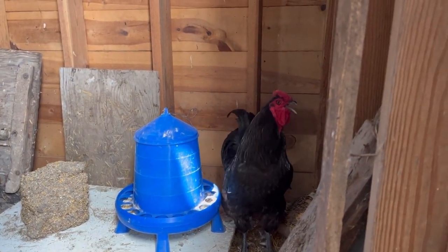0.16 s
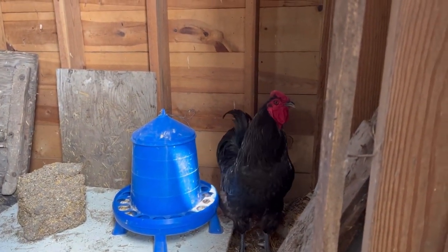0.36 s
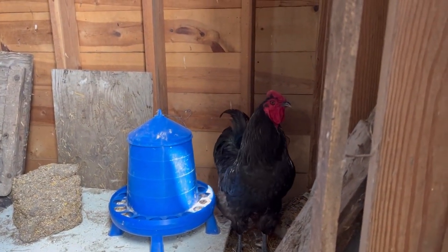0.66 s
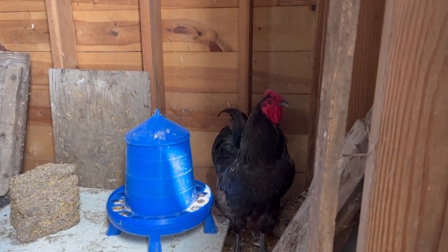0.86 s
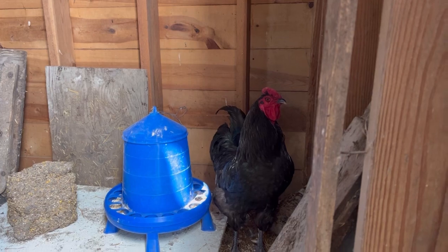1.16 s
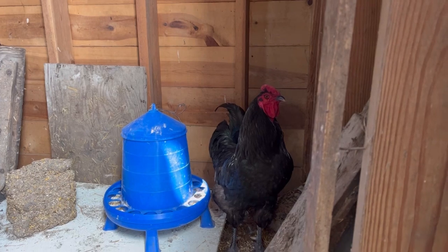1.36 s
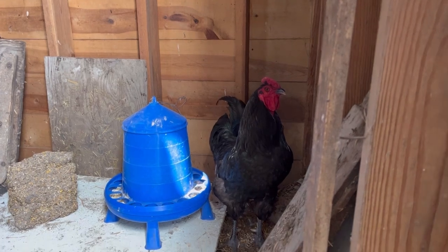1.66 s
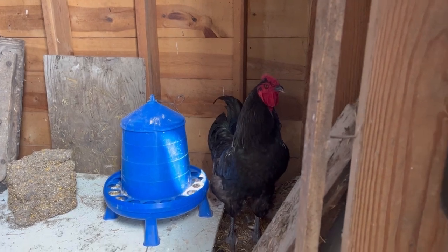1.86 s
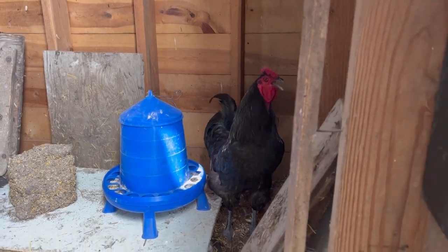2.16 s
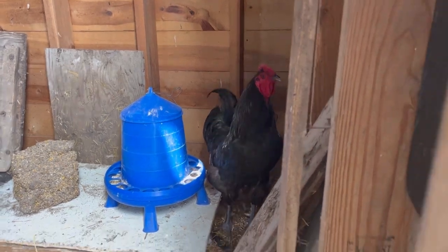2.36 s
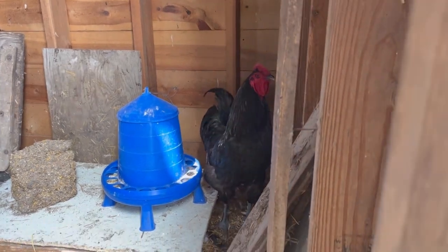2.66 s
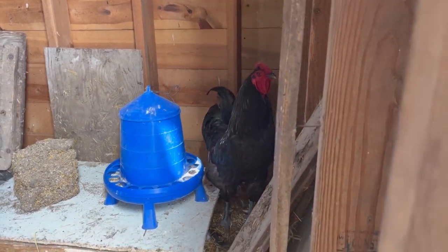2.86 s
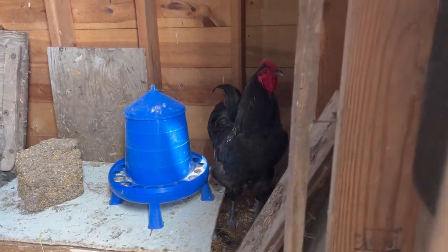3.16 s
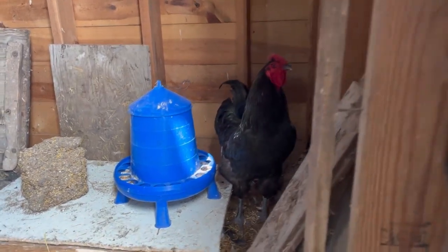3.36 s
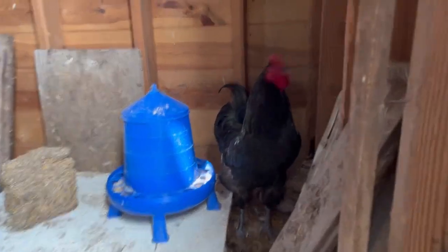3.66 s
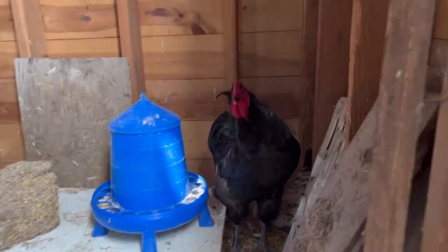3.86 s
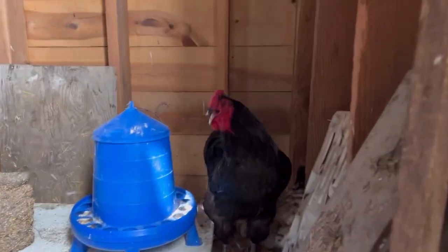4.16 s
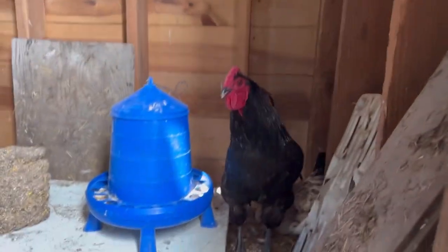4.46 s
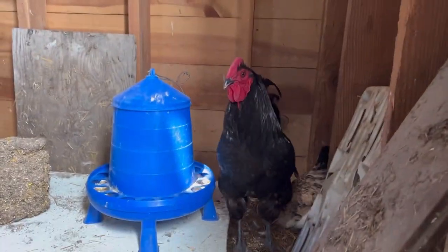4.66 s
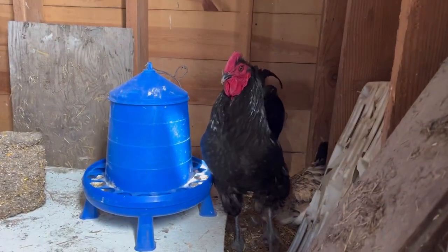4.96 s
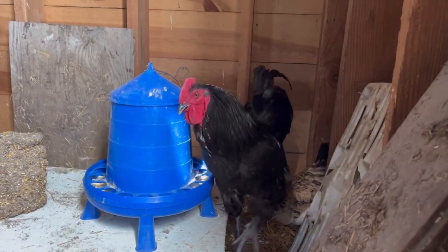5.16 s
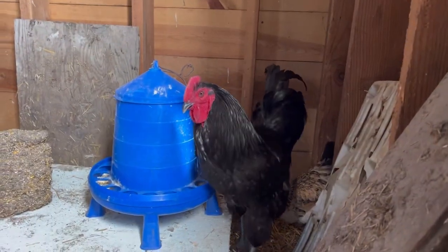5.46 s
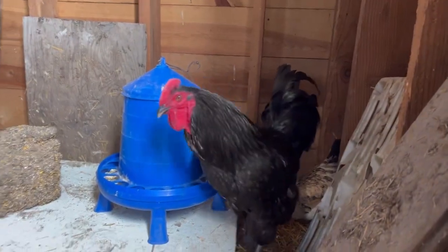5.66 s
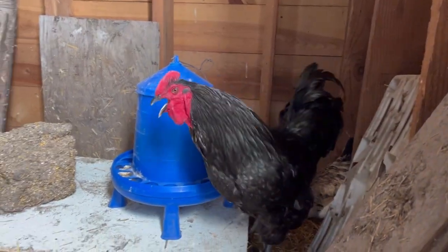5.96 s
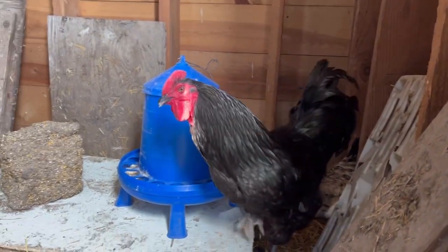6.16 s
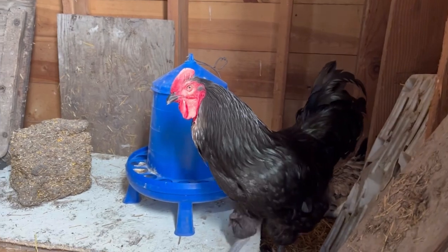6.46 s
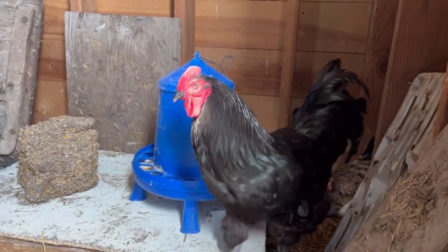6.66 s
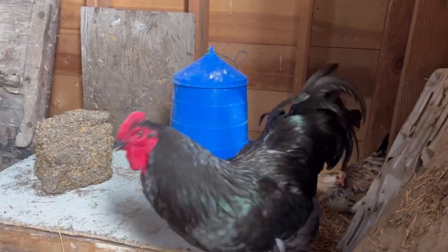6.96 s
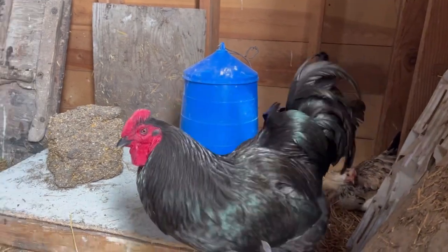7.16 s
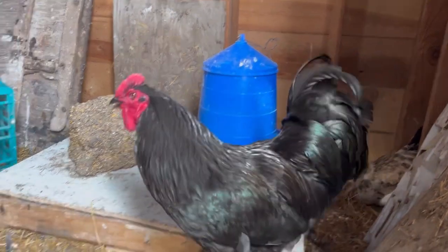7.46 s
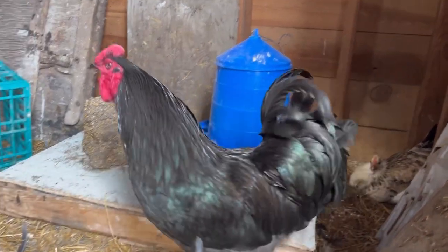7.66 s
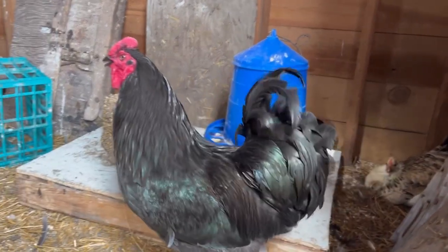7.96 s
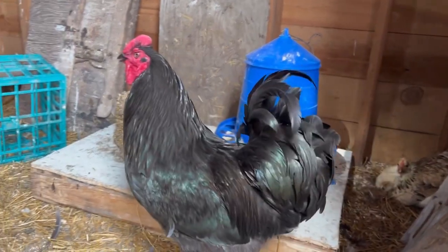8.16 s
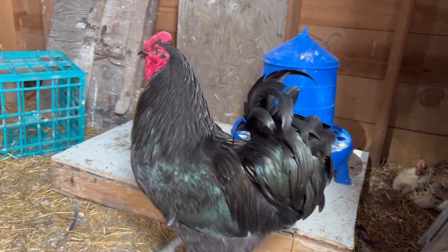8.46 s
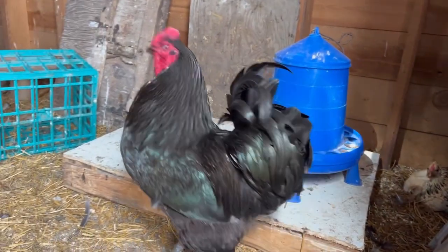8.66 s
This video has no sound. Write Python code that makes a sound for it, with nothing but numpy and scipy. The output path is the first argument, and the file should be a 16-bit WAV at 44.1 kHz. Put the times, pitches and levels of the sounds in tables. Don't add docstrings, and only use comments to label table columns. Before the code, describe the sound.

Close handheld stereo microphone in a small plank coop. A rooster's rough cluck jumps straight into a held squawk, followed by a board knock and faint birds outside. Paired or lone clucks lead to four more squawks over nearly nine seconds, with straw snaps, claw clicks and dull foot thumps between. Soft handling rumble and straw hiss continue throughout.

```python
import sys
import numpy as np
from scipy import signal
from scipy.fft import rfft, irfft, next_fast_len
from scipy.io import wavfile
from scipy.ndimage import uniform_filter1d

SR = 44100
rng = np.random.default_rng(int(sys.argv[2]) if len(sys.argv) > 2 else 0)


def nominal_scale(level):
    x = np.asarray(level, float) / 20
    return 10 ** x


def bounce(signal):
    frames = np.transpose(np.atleast_2d(signal))
    limited = np.clip(frames, -1, 1)
    pcm = np.round(limited * 32767).astype(np.int16)
    wavfile.write(sys.argv[1], SR, pcm)


N = 387638


def rms_one(x):
    return x / np.sqrt(np.mean(x ** 2) + 1e-20)


def at_hz(points, hz):
    p = np.array(points)
    return np.interp(np.log(np.maximum(hz, 1)), np.log(np.maximum(p[:, 0], 1)), p[:, 1])


def over_time(points):
    return np.interp(np.arange(N) / SR, *np.transpose(points))


def stretch(rows, fade_s):
    s, *columns = np.transpose(rows)
    t = np.arange(max(round(s[0] * SR), 0), min(round(s[-1] * SR), N))
    edge = np.clip(np.minimum(t - t[0], t[-1] - t) / (fade_s * SR), 0, 1)
    return t[0], [np.interp(t / SR, s, c) for c in columns], edge


def drift(size, rate_hz):
    r = np.exp(-2 * np.pi * rate_hz / SR)
    noise = rng.standard_normal(size + 4000)
    return rms_one(signal.lfilter([1], [1, -2 * r, r * r], noise)[4000:])


def coloured(gain_db, shape):
    hz = np.fft.rfftfreq(shape[-1], 1 / SR)
    return rms_one(irfft(rfft(rng.standard_normal(shape)) * nominal_scale(gain_db(hz)), shape[-1]))


def add(out, at, x):
    out[..., at:at + x.shape[-1]] += x[..., :max(out.shape[-1] - at, 0)]


def evened(x):
    return x / np.sqrt(uniform_filter1d(x ** 2, size=530) + 1e-9)


def above(x, hz):
    return signal.sosfilt(signal.butter(4, hz, "high", fs=SR, output="sos"), x)


def swells(rows):
    t = np.arange(0, N + 32, 32) / SR
    level = 0
    for s, peak_db, rise_s, t60_s in rows:
        fall_db = np.where(t < s, 20 * (s - t) / rise_s, 60 * (t - s) / t60_s)
        level = level + nominal_scale(np.maximum(peak_db - fall_db, -200))
    return np.interp(np.arange(N) / SR, t, level)


# (frequency [Hz], density [dB per Hz])
RUMBLE = [(12, -45.5), (20, -16.5), (59, 4), (118, 0), (167, -22), (200, -15), (260, -46.5), (440, -120)]
BOARDS = [(71, -30), (120, -6), (194, -4), (254, -6), (550, -11), (1200, -24.5), (1560, -52.5),
          (2640, -120)]
STRAW = [(470, -17), (800, -7.5), (4000, 1), (6190, -4), (8500, -3), (12400, -8.5), (14600, -4),
         (15700, -14)]
HAY = [(400, -28), (900, -5.5), (1500, 4), (2400, -12.5), (4000, -32), (8000, -58)]
# (time [s], level [dB])
STIR = [(0, -73.5), (.6, -75), (1.16, -84.5), (1.62, -80), (2.75, -77.5), (3.27, -72), (3.4, -72.5),
        (3.52, -73), (3.7, -71.5), (4.8, -72), (5.28, -75), (5.4, -72), (6.3, -74), (6.58, -66), (6.8, -67),
        (7.2, -70), (8.3, -78.5), (8.79, -72)]
# (time [s], peak [dB], rise [s], t60 [s])
BUMPS = [(0.022, -46.5, 0.057, 0.19), (1.3, -74, 0.084, .8), (6, -53.5, 0.049, 1),
         (1.7, -46.5, 0.069, 0.44), (2.2, -60, 0.11, 0.68), (3.3, -72.5, 0.11, 0.54),
         (2.8, -56, 0.065, 0.5), (1.6, -67, 0.048, 0.42), (5.7, -80, 0.046, 0.5), (4.1, -65.5, .06, 0.43),
         (2.7, -58.5, 0.054, .5), (3.6, -65.5, 0.15, 0.93), (.3, -73, .1, .5), (3.7, -76, 0.17, 0.516),
         (3, -55, 0.1, 0.25), (3.1, -57.5, 0.075, 0.2), (6.1, -50.5, 0.057, 1.3), (3.6, -48.5, 0.11, 0.29),
         (7.3, -46, 0.069, 1.1), (9.3, -56.5, 0.047, 1.3), (8, -57.5, 0.071, 1.1), (2.3, -61, 0.074, 0.4),
         (12, -56, .1, 0.61), (8.381, -54.5, 0.2, 0.97)]
# (time [s], peak [dB], rise [s], t60 [s])
SCUFFS = [(2.74, -79.5, 0.039, .3), (3.3, -68, 0.069, 0.299), (3.37, -75, .04, 0.32),
          (3.63, -79, 0.058, 0.29), (5.36, -62.5, 0.04, 0.3), (6.47, -66, 0.064, 0.32),
          (6.87, -64, 0.16, 0.25), (7.06, -64.5, 0.0693, 0.96), (8.12, -61.5, 0.073, 0.35),
          (8.4, -68, 0.017, 0.32), (8.7, -75, 0.084, 0.8)]
HAY_DB = -4
RUMBLE_DB, RUMBLE_FOLLOWS = -77.5, 2.1
BOARDS_DB, BOARDS_FOLLOW = -77.5, 0.27
SHAKE_RUMBLE_DB, SHAKE_BOARDS_DB = -46, -35.5


def shuffling(low_voice):
    stir_db = over_time(STIR)
    shake = np.sqrt(uniform_filter1d(low_voice ** 2, size=2200) + 1e-14)
    bumps = swells(BUMPS)
    rumble = nominal_scale(RUMBLE_DB + RUMBLE_FOLLOWS * (stir_db + 73.5)) + bumps + nominal_scale(SHAKE_RUMBLE_DB) * shake
    boards = nominal_scale(BOARDS_DB + BOARDS_FOLLOW * (stir_db + 78.5))
    boards = boards + nominal_scale(-13.5) * bumps + nominal_scale(SHAKE_BOARDS_DB) * shake
    straw = nominal_scale(stir_db + 3.5) + swells(SCUFFS)
    layers = [(RUMBLE, rumble * nominal_scale(-2.5 + 2.5 * drift(N, 5)), -14),
              (BOARDS, boards * nominal_scale(2.1 * drift(N, 6)), -9),
              (STRAW, straw * nominal_scale(1.0 * drift(N, 25) + 0.97 * drift(N, 4.1)), -30),
              (HAY, nominal_scale(stir_db + HAY_DB + 1.8 * drift(N, 5.6)), -12)]
    out = 0
    for spectrum, level, apart_db in layers:
        mid, side = coloured(lambda f: at_hz(spectrum, f), (2, next_fast_len(N)))[:, :N]
        out = out + level * (mid + nominal_scale(apart_db) * side * [[1], [-1]])
    return out


# (start [s], length [s], first pitch [Hz], last pitch [Hz],
# level [dB])
BIRDS = [(.56, .1, 2930, 2650, -66), (.67, .08, 3400, 3080, -67), (1.04, .12, 2160, 2050, -72),
         (1.2, .12, 2300, 2120, -69), (1.33, .23, 2930, 2600, -68), (1.235, .045, 3920, 3880, -68),
         (2.8, .09, 3200, 2940, -69), (4.86, .19, 2030, 2000, -62.5), (5.0, .33, 3120, 3150, -63.5),
         (5.03, .33, 2230, 3080, -61.5), (6.57, .15, 3020, 3020, -58), (6.57, .15, 4260, 4150, -57),
         (8.38, .07, 4300, 4080, -62), (2.502, .17, 5200, 5070, -82), (2.88, .18, 5140, 5270, -82),
         (8.6, .12, 3230, 2530, -63.5), (7.12, .04, 2500, 3300, -64), (7.16, .055, 3100, 2650, -63),
         (7.01, .05, 3300, 3000, -65), (7.04, .07, 2200, 2100, -65), (1.12, .06, 3850, 3800, -77),
         (2.88, .05, 3900, 3750, -70), (6.57, .07, 2500, 2500, -60)]
BLUR_HZ = [250, 335, 196.7, 298, 445, 80.2, 149, 29.3, 149, 285, 500, 202, 684, 40, 40.2, 120, 100.6, 95.8,
           148.7, 80.3, 99.2, 150, 60]
BIRD_TOP, BIRD_START_DB, BIRD_END_DB = 0.37, -2, -6.5


def birds():
    out = np.zeros(N)
    for (s, length_s, first_hz, last_hz, level_db), blur_hz in zip(BIRDS, BLUR_HZ):
        shape = [(0, BIRD_START_DB), (BIRD_TOP, 0), (1, BIRD_END_DB)]
        rows = [(s + a * length_s, first_hz + a * (last_hz - first_hz), db) for a, db in shape]
        at, (hz, shape_db), edge = stretch(rows, 0.0091)
        cycle = 2 * np.pi * np.cumsum(hz) / SR
        note = drift(len(hz), blur_hz) * np.cos(cycle) + drift(len(hz), blur_hz) * np.sin(cycle)
        add(out, at, edge * nominal_scale(level_db + shape_db) * note)
    return out


# (time [s], peak [dB], pitch [Hz], t60 [s])
KNOCKS = [(0.627, -41.5, 242, 0.137), (0.701, -50, 324, 0.082), (.8, -60, 295, 0.35),
          (.88, -58.5, 380, 0.15), (2.712, -39, 151.6, 0.24), (2.922, -63.5, 166, 0.079),
          (3.019, -33.5, 139, 0.13), (3.043, -31.5, 119, 0.121), (3.202, -29.5, 107.9, 0.197),
          (3.24, -47, 99.7, 0.108), (3.669, -73, 106.5, 0.067), (4.857, -40.5, 412, 0.082),
          (4.9, -55.5, 446, 0.032), (4.929, -53, 467, 0.21), (5.06, -70, 61, 0.041),
          (5.135, -65.5, 63.3, 0.14), (5.228, -41.5, 292, 0.23), (5.331, -51.5, 261, 0.44),
          (6.586, -36.5, 106.7, 0.44), (6.784, -28.5, 143.6, 0.17), (8.138, -32.5, 260.7, 0.18),
          (8.301, -43.5, 254, 0.11)]


def knocks():
    out, t = np.zeros(N), np.arange(12000) / SR
    for s, peak_db, hz, t60_s in KNOCKS:
        shape = [(hz * .4, -30), (hz * .8, -5), (hz, 0), (hz * 1.4, -8), (hz * 4, -25), (8000, -60)]
        body = coloured(lambda f: at_hz(shape, f), t.shape) * (1 - np.exp(-t / 0.0075))
        add(out, round(s * SR), nominal_scale(peak_db - 4.0 - 60 * t / t60_s) * body)
    return out


# (time [s], peak [dB], pitch [Hz], t60 [s])
TICKS = [(2.7078, -38, 1330, 0.04), (3.017, -34, 1480, 0.025), (3.0392, -40, 2360, 0.046),
         (3.2143, -46, 2930, 0.053), (3.2452, -35.5, 1195, 0.032), (3.3382, -43, 4300, 0.056),
         (3.6075, -42.5, 4520, 0.023), (3.6698, -37.5, 1270, 0.043), (5.3168, -28, 1580, 0.036),
         (5.3334, -27, 4160, 0.029), (6.3871, -27.5, 4540, 0.05), (6.4503, -23.5, 3900, 0.021),
         (6.5655, -43.5, 2510, 0.031), (6.779, -36.5, 1015, 0.044), (6.915, -40, 8800, 0.019),
         (6.8321, -46, 3450, 0.026), (3.1855, -44.5, 1550, 0.041), (3.4309, -49, 1423, 0.024),
         (3.5297, -43, 4900, 0.013), (3.7113, -50, 4850, .02), (3.7777, -54.5, 1520, 0.021),
         (5.225, -38.5, 1200, 0.019), (5.36, -44, 4260, 0.022), (2.695, -45.5, 4780, 0.018),
         (8.5144, -50, 4390, 0.021)]


def ticks():
    out, t = np.zeros(N), np.arange(6000) / SR
    for s, peak_db, hz, t60_s in TICKS:
        shape = [(300, -22), (hz * 0.14, -7), (hz, 0), (hz * 1.4, -8), (9000, -18), (15000, -22)]
        puff = coloured(lambda f: at_hz(shape, f), t.shape) * (1 - np.exp(-t / .001))
        add(out, round(s * SR), nominal_scale(peak_db - 8.5 - 60 * t / t60_s) * puff)
    return out


def stack(pitch_hz, gain_db, flicker_db, count, scatter_rad=2.5):
    k = np.arange(1, count + 1)[:, None]
    size = len(pitch_hz)
    cycle = 2 * np.pi * np.cumsum(pitch_hz) / SR
    steps = np.repeat(rng.standard_normal((count, size // 500 + 1)), 500, axis=1)[:, :size]
    depth_db = flicker_db * (k * pitch_hz.mean() / 2500) ** .7
    flicker = depth_db * uniform_filter1d(steps, size=400, axis=1)
    phase = rng.uniform(0, scatter_rad, (count, 1))
    partials = nominal_scale(gain_db(k * pitch_hz) + flicker) * np.sin(k * cycle + phase)
    return partials.sum(axis=0), cycle


# (centre [Hz], width [Hz], peak [dB])
THROAT = [(215, 110, -12), (456, 100, 3.5), (604, 100, 11.5), (953, 230, 1.5), (1550, 700, -14.5),
          (2000, 180, -1.5), (3000, 460, -15), (3820, 700, -24.5), (4950, 160, -30.5), (7240, 6200, -41),
          (9000, 860, -54), (11290, 7700, -55.5)]
NECK_HZ = 2000


def throat(hz, beak_db, pipe_hz, lifts_db):
    power = 1e-9
    for centre_hz, width_hz, peak_db in THROAT:
        upper = centre_hz > 1400
        lift_db = np.dot(lifts_db, [centre_hz < 520, 800 < centre_hz < 1400, centre_hz > 2400])
        off = (hz - centre_hz * pipe_hz / NECK_HZ) / (.5 * width_hz)
        power = power + nominal_scale(peak_db + lift_db + upper * beak_db) ** 2 / (1 + off ** 2) ** 2
    return 10 * np.log10(power)


# (start [s], beak opening [dB], pitch [Hz], level [dB], windpipe resonance [Hz])
CLUCKS = [(-.02, 0.5, 225.5, -15, 2000), (1.642, 3.5, 193.1, -23, 1863), (1.866, 3, 206.3, -17, 1902),
          (2.425, -3, 202.3, -22, 1869), (3.832, -2, 233.2, -22.5, 1760), (4.059, 0, 207.2, -13.5, 2013),
          (4.615, 2.5, 215, -17.5, 2035), (5.482, -3, 201.5, -16, 2193), (5.708, 1.4, 215, -13.5, 2086),
          (7.215, -7, 210.1, -16, 2145), (7.436, -5, 236.4, -12, 2196), (7.942, -2, 214.2, -18, 2029)]
# (length [s], chest [dB], second resonance [dB], mouth [dB], pitch rise [share per dB])
CLUCK_COLOUR = [(.06, 2, 0.5, 1.5, .009), (0.066, 0, 2.5, -5.5, .009), (0.068, -4.5, -2.5, -3, .009),
                (.059, -0.5, -4.5, -3, .009), (0.05, 7, 8, -0.5, .009), (.06, -5.5, 6, 2, .009),
                (.058, 4, 5, 2, .009), (.061, 3.5, -1, -2, .012), (.059, 0.5, 1, -1, .009),
                (.06, 3.5, -1, 3, .014), (.05, -3, -2.5, -1, .009), (.062, 0.5, 0.5, -1, .009)]
# (share of length [0-1], level [dB], beak opening [dB])
CLUCK_SHAPE = [
    (0, -12, -3),
    (.25, -3.5, -4.5),
    (0.478, 2.25, 4),
    (0.748, -2.5, -1),
    (1, -8.5, -3),
]


def clucks():
    out = np.zeros(N)
    for (s, open_db, hz, loud_db, pipe_hz), (length_s, *lifts_db, arch) in zip(CLUCKS, CLUCK_COLOUR):
        rows = [(s + a * length_s, *rest) for a, *rest in CLUCK_SHAPE]
        at, (level_db, beak_db), edge = stretch(rows, 0.0018)
        beak_db = beak_db + open_db
        size = len(edge)
        uneven = 1 + .038 * drift(size, 120) + .025 * drift(size, 25)
        wavering_hz = hz * (1.03 + arch * level_db) * uneven
        moving_pipe_hz = pipe_hz * (1 + .006 * level_db)
        tone, cycle = stack(wavering_hz, lambda f: throat(f, beak_db, moving_pipe_hz, lifts_db),
                            3.0, count=66, scatter_rad=2.2)
        air = coloured(lambda f: throat(f, beak_db.mean(), pipe_hz, lifts_db), edge.shape)
        air = air * (1 + np.cos(cycle)) ** 2
        add(out, at, edge * nominal_scale(loud_db + level_db) * (evened(tone) + nominal_scale(-18) * air))
    return out


# (start [s], length [s], held pitch [Hz], level [dB], overshoot [share of pitch])
SQUAWKS = [
    (0.045, 0.27, 689.9, -15, 0.024),
    (1.96, 0.26, 693.3, -14.5, 0.039),
    (4.160, 0.25, 689.5, -14.5, .05),
    (5.802, .252, 692.3, -15, .04),
    (7.53, 0.25, 683.7, -15, .045),
]
PARTIALS = [(-0.5, -7.5, -7, -8, -12, -20, -16, -30.5, -29, -38.5, -31.5),
            (0.5, -6, -7.5, -13, -11, -26.5, -15.5, -34.5, -29, -41, -38),
            (0.5, -3, -9, -11, -11.5, -31, -26, -36, -31, -44.5, -42.5),
            (2, -9.5, -9, -9, -27, -21, -27, -28.5, -34, -31, -35),
            (4, -8, -7.5, -8, -21, -16, -26, -24.5, -31.5, -37.5, -37)]
# (frequency [Hz], level [dB])
SHRILL = [(8300, -44.5), (9500, -41), (11500, -51.5), (13500, -53.5), (15000, -56.5)]
TURN = [(-0.5, 3.5, 6, -4, -1, -6.5, 3.5), (0.5, -3.5, -3.5, 3, -5, -11.5, -9.5),
        (2, 5.5, -2.5, -6, -7, -17.5, -5), (2, 9, 1.5, -2.5, -14.5, -3.5, -13),
        (0, 8, 4.5, 7.5, -9, 3.5, -13.5)]
HOARSE_DB = [-2, -2, -2, -4, -6]
LOW_SHARE = [.88, .87, .88, .86, .85]
# (low-register top loss [dB], start [dB], end [dB], held note [dB], shrill [dB])
GAZE = [(-6.5, 2.5, 2.5, -1.5, 0.5), (-0.5, -0.5, 1.5, -3, 0), (-7.5, 5.5, 1.5, 1, 0.5),
        (-1.5, 3.5, -2, -1, 0.5), (-2, 4, -0.5, 1.5, -2)]
SCOOP = [.95, 1.2, 1.15, 1.4, 1.1]
SWAY = [(-2, -0.5, 1, 2), (-2, -2.5, -5, -2), (1, -4.5, 5.5, -0.72), (4, 5.5, -5, 0), (6.5, 3.5, 2, 2)]
# (time after start [s], depth in low register [share], level [dB], croak [dB])
BREAK_IN = [
    (0, -1.3, -9, -8),
    (.005, -1.1, -1, -8),
    (.012, -.9, 6, -10),
    (.024, -.6, 7, -12),
    (.031, 0, 5, -16),
    (.06, 0, 3, -23),
    (.11, 0, 0, -40),
]
# (time before end [s], depth in low register [share], level [dB], croak [dB])
BREAK_OUT = [
    (.09, 0, -1, -42),
    (.038, 0, -.5, -30),
    (.03, -.15, 1, -18),
    (.023, -.7, 4, -10),
    (.012, -.9, 3, -6),
    (0, -1.5, -9, -4),
]
# (frequency [Hz], density [dB per Hz])
CROAK = [(250, -23.5), (600, 0.5), (1100, -4.5), (1900, 1), (2500, -9), (3200, -4.5), (4500, -15.5),
         (7500, -29), (12000, -35.5)]
# (frequency [Hz], density [dB per Hz])
DROP_CROAK = [(150, -19), (230, -12), (420, -5), (600, 0.5), (1000, -4.5), (1600, -6), (2100, -9.5),
              (3500, -16.5), (6000, -33.5), (12000, -46.5)]
STEADY_HZ = 692
SAG_S = .05
SKIP_DEPTH, CROAK_AIR_DB = 0.18, -0.5


def squawks():
    out = np.zeros(N)
    tables = zip(SQUAWKS, PARTIALS, TURN, HOARSE_DB, LOW_SHARE, GAZE, SCOOP, SWAY)
    for call, partials_db, turn_db, hoarse_db, low_share, gaze, scoop, sway_db in tables:
        s, length_s, held_hz, loud_db, overshoot = call
        top_db, in_db, out_db, held_db, shrill_db = gaze
        rows = [(s + a * scoop, low, db + in_db * (low < 0), croak + hoarse_db, top_db * min(-low, 1))
                for a, low, db, croak in BREAK_IN]
        rows += [(s + length_s - b, low, db + out_db * (low < 0), croak, 8 * low)
                 for b, low, db, croak in BREAK_OUT]
        at, (low, level_db, croak_db, strained_top_db), edge = stretch(rows, 0.0041)
        size = len(low)
        strain = np.clip(nominal_scale(croak_db), 0, 1)

        since_break_s = np.maximum(np.arange(size) / SR - BREAK_IN[4][0] * scoop, 0)
        sag = 1 + overshoot * np.exp(-since_break_s / SAG_S) * np.clip(1 + low, 0, 1)
        hz = held_hz * (1 + low * (1 - low_share)) * sag
        wavering_hz = hz * (1 + (.0012 + .09 * strain) * drift(size, 150))

        tract = [(k * STEADY_HZ, db) for k, db in enumerate(partials_db, start=1)]
        tract += [(f, db + shrill_db) for f, db in SHRILL]
        turn = [(k * STEADY_HZ, db) for k, db in enumerate([*turn_db, 0], start=1)]
        progress = np.clip(since_break_s / (length_s - .1), 0, 1) - .5
        swaying_db = np.interp(progress, np.linspace(-.5, .5, 4), sway_db) * np.clip(1 + 3 * low, 0, 1)

        def gain_db(f):
            strained_db = (strained_top_db - 15 * strain) * np.clip(f / 700 - 1, 0, 1.6)
            return at_hz(tract, f) + progress * at_hz(turn, f) + strained_db + swaying_db * (f < 900)

        tone, cycle = stack(wavering_hz, gain_db, 4.0, count=21)
        skipping = 1 + SKIP_DEPTH * strain * np.cos(cycle / 2)
        rising_breath = coloured(lambda f: at_hz(CROAK, f), hz.shape)
        dropping_breath = coloured(lambda f: at_hz(DROP_CROAK, f), hz.shape)
        breath = np.where(progress < 0, rising_breath, dropping_breath)
        air = breath * (1 + np.cos(cycle / 3)) * nominal_scale(3.3 * drift(size, 54))
        air = air * nominal_scale(croak_db + CROAK_AIR_DB) * np.clip(8 * strain, 0, 1)
        level = nominal_scale(loud_db + level_db + held_db * (1 - strain) ** 8)
        add(out, at, edge * level * (rms_one(tone) * skipping + air))
    return out


# (low [Hz], high [Hz], t60 [s], level [dB], share heard by one port only [0-1])
COOP = [(59.6, 290, 0.41, -10, 0.03), (380, 640, 0.27, -2.5, 0.2), (652, 760, 0.45, -7, 0.8),
        (772.7, 1900, 0.3, -6, 0.1), (1550, 2950, 0.28, -4.5, 0.5), (2910, 6800, 0.23, -1, 0.97),
        (6400, 16000, 0.1, -2.5, 0.2)]


def coop(x):
    t = np.arange(30000) / SR
    hz = np.fft.rfftfreq(len(t), 1 / SR)
    response = np.zeros((2, len(t)))
    response[:, 0] = 1
    for low_hz, high_hz, t60_s, level_db, own in COOP:
        band = (hz >= low_hz) & (hz < high_hz)
        shared, left, right = irfft(rfft(rng.standard_normal((3, len(t)))) * band, len(t))
        lingering = nominal_scale(-21 - 60 * t / (1.8 * t60_s))
        decay = (nominal_scale(-60 * t / t60_s) + lingering) * np.clip(t / 0.0028 - 1, 0, 1)
        echoes = np.sqrt(1 - own) * shared + np.sqrt(own) * np.array([left, right])
        response += nominal_scale(level_db) * echoes * decay / np.sqrt(np.sum(decay ** 2))
    return signal.fftconvolve(x[None], response, axes=1)[:, :N]


# (time [s], left-port lead in the low voice [rad])
STANCE = [(0, -.2), (1.0, 0), (1.9, .7), (4.2, .8), (5.9, .6), (7.0, .15), (8.79, .1)]


def sideways(x):
    size = next_fast_len(N)
    hz = np.fft.rfftfreq(size, 1 / SR)
    low = rfft(x, size) * np.clip((hz - 300) / 200, 0, 1) * np.clip((1900 - hz) / 300, 0, 1)
    half = over_time(STANCE) * [[.5], [-.5]]
    in_phase = irfft(low, size)[:, :N]
    quadrature = irfft(1j * low, size)[:, :N]
    return x + in_phase * (np.cos(half) - 1) + quadrature * np.sin(half)


# (frequency [Hz], left-port lead [rad])
LEAD = [(0, 0), (700, .6), (1500, 1.1), (2150, .3), (3100, 1.2), (5000, .7), (6200, -1.2), (7600, -2.9),
        (8300, -3.14), (9200, -3.4), (10800, -6.0), (13000, -7.0), (14500, -9.0), (15200, -9.5)]
# (frequency [Hz], left-right [dB])
TILT = [(110, -0.5), (200, -1.5), (380, 1.0), (700, 0.0), (1290, -1.0), (2380, 1.5), (5000, 2), (8000, 0.0)]
# (frequency [Hz], gain [dB])
CASE_DIP = [(3750, 0), (4150, -7), (4600, 0)]


def ports(x):
    size, half = next_fast_len(N + 999), np.array([[.5], [-.5]])
    hz = np.fft.rfftfreq(size, 1 / SR)
    gain = nominal_scale(half * at_hz(TILT, hz) + at_hz(CASE_DIP, hz))
    shift = gain * np.exp(1j * half * np.interp(hz, *np.transpose(LEAD)))
    return irfft(rfft(x, size) * shift, size)[:, :N]


# (time [s], left-right [dB])
HEAD_PAN = [(0.0, 0.5), (0.68, -3), (0.778, 2), (2.91, -1.5), (5.21, -0.5), (5.88, 1), (6.9, -4.5),
            (7.0, -0.5), (7.66, 2), (8.79, -6)]


def scene():
    snaps = ticks()
    low_voice = above(clucks(), 180)
    high_voice = above(squawks(), 190)
    inside = high_voice + low_voice + nominal_scale(1.5) * snaps + knocks() + birds()
    panned = coop(nominal_scale(-2.5) * inside) * nominal_scale(over_time(HEAD_PAN) * [[.5], [-.5]])
    return ports(sideways(panned) + nominal_scale(-21) * snaps + shuffling(low_voice))


def band_limit(x):
    return signal.sosfilt(signal.butter(12, 15830, fs=SR, output="sos"), x)


def record(dry):
    size = np.abs(dry)
    rounded = np.where(size > .6, np.sign(dry) * (.6 + .34 * np.tanh((size - .6) / .34)), dry)
    cutoff_hz = 16400
    mix = signal.sosfilt(signal.cheby2(10, 60, cutoff_hz, fs=SR, output="sos"), rounded)
    return band_limit(mix)


dry = scene()
out = record(dry)
bounce(out)
```